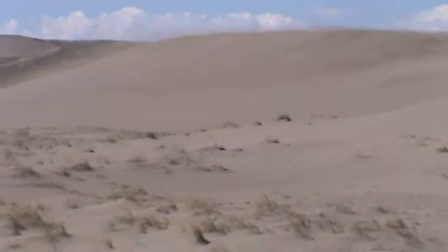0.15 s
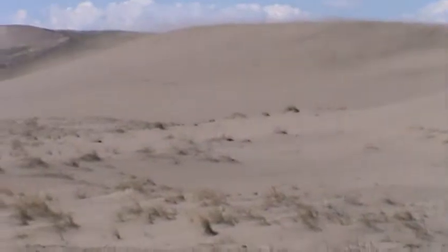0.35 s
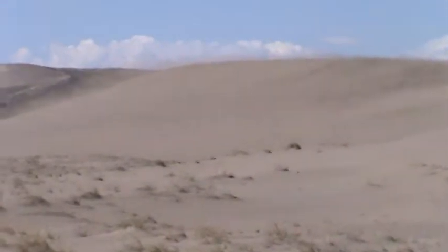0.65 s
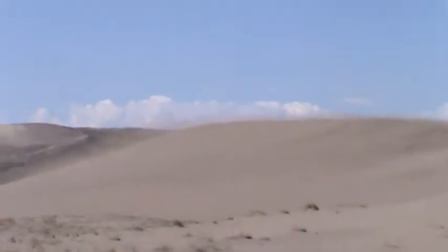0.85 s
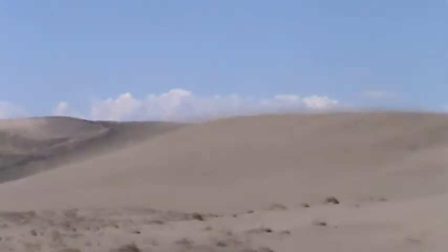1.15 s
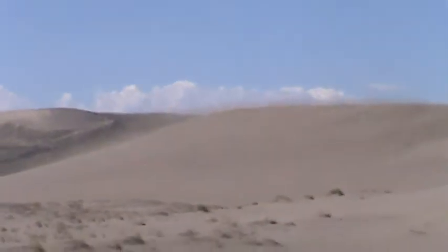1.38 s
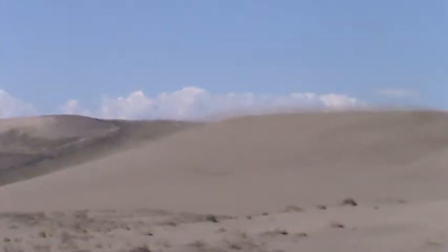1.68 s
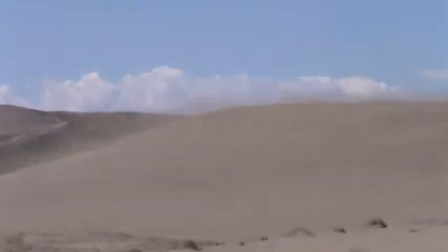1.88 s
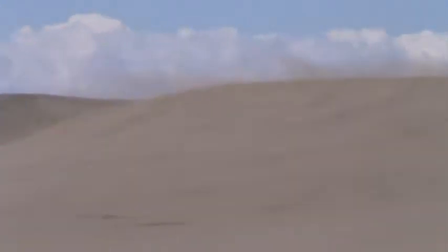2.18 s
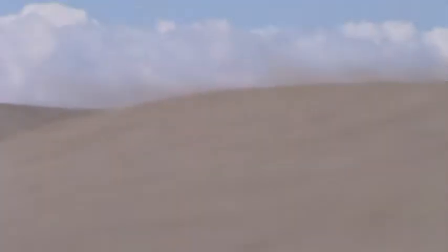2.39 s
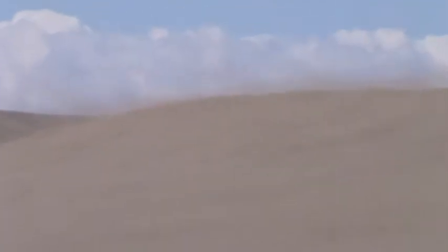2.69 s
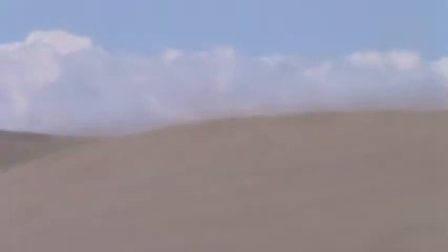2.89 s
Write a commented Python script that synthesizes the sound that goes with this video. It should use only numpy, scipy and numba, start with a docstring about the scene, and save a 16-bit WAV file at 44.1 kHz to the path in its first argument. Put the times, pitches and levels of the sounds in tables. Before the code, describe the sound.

Strong wind blows straight into an unshielded stereo microphone on open dunes. A low, rasping roar opens with thumps near 0.2 and 0.4 s, then runs fairly steadily, its airy hiss brighter around 0.6 s. It drops briefly about 1.3-1.5 s, then returns with heavy bass buffets at 1.6-1.8 s. From 2 s it turns choppy, with quick gaps, flaring gusts, pops near 2.3 and 2.7 s, and faint sand ticks.

```python
"""Strong wind over open dunes roars in a camera's two microphone ports, exposed with no distance between.
Faster flow sheds smaller eddies, so each gust brightens the roar: bands of noise follow body, flow and hiss.
Big slow eddies thump both ports together, as bass noise and as single pressure pulses.
Drifting sand hisses faintly, a few grains tick on the housing, and a limiter holds the loudest buffets down."""
import sys
import numpy as np
from scipy import signal
from scipy.fft import rfft, irfft
from scipy.io import wavfile
from scipy.ndimage import uniform_filter1d
from numba import njit

SR = 44100
rng = np.random.default_rng(int(sys.argv[2]) if len(sys.argv) > 2 else 0)


def store_wav(level_fs):
    """Save 16-bit WAV to argv[1]."""
    pcm = np.round(np.clip(np.atleast_2d(level_fs), -1, 1) * 32767)
    wavfile.write(sys.argv[1], SR, pcm.T.astype(np.int16))


N = 134064
TIME = np.arange(N) / SR  # t/s
FREQ = np.maximum(np.arange(N // 2 + 1) * SR / N, 1)  # f/Hz, held above zero for the logarithms

# Colour tables give relative density, since colour() evens out their total power.
# colour of the drifting sand's hiss [f/Hz, level/dB per Hz]
SAND_HISS_COLOUR = [(500,2),(2500,4),(5800,-3),(9000,-13),(15500,-19.5)]
# sand grains striking the housing, before colouring [t/s, level/dB, decay/s]
GRAIN_TICKS = [(1.5159,-18,0.0012),(1.6653,-27,0.0015),(2.24,-22.5,.001),(2.2402,-17.5,0.0015),(2.2558,-21,0.0017)]
# colour of a tick on the housing [f/Hz, level/dB per Hz]
TICK_COLOUR = [(800,-9.5),(2400,-6.5),(2950,9),(3600,-6.5),(5000,0.5),(7600,-4.5),(9700,-20.5),(15500,-21)]
# course of the bass buffeting, before its trim [t/s, level/dB]
BUFFET_LEVEL = [(0.0, -24), (0.08, -30.5), (0.17, -16.5), (0.22, -33), (0.315, -19.5), (0.34, -27),
                (0.445, -23.5), (0.58, -30), (0.71, -29), (0.74, -26), (0.78, -35), (0.97, -26.5),
                (1.065, -31), (1.14, -24.5), (1.39, -31), (1.425, -25.5), (1.46, -44), (1.495, -18),
                (1.575, -32), (1.635, -16), (1.66, -24), (1.705, -18), (1.735, -34), (1.79, -18),
                (1.915, -29.5), (1.995, -20), (2.175, -21.5), (2.24, -29), (2.285, -16.5), (2.32, -30),
                (2.42, -30), (2.68, -19), (2.845, -24), (2.89, -20), (2.99, -20), (3.04, -22.5)]
# colour of the big eddies [f/Hz, level/dB per Hz]
RUMBLE_COLOUR = [(12,-18.5),(25,-6),(45,-3.5),(75,0.5),(125,1.5),(200,-7),(400,-20.5),(1000,-74)]
# single hard buffets [t/s, left peak/full scale, right peak/full scale, half-length/s]
THUMPS = [(0.1626,0.3,0.46,0.0011),(0.4,0.36,0.77,0.0011),(1.6166,0.35,0.022,.0016),(1.643,0.6,.22,0.0026),(2.288,-0.46,-0.23,0.0033),(2.699,-0.44,-0.069,0.0023)]
# strength of the flow at the ports, as the level of its rasp [t/s, level/dB]
FLOW_LEVEL = [(0.0, -25), (0.015, -26.5), (0.075, -30), (0.12, -26), (0.14, -30.5), (0.17, -20),
              (0.19, -31.5), (0.26, -22.5), (0.545, -24), (0.575, -22), (0.7, -21.5), (0.71, -26),
              (0.735, -20.5), (0.97, -24), (1.0, -24.5), (1.23, -25.5), (1.25, -35), (1.265, -22),
              (1.31, -27), (1.33, -34), (1.355, -28.5), (1.38, -48), (1.393, -30), (1.404, -29),
              (1.42, -47), (1.47, -49), (1.52, -23), (1.59, -25.5), (1.6, -33), (1.64, -22), (1.7, -19.5),
              (1.73, -25), (1.76, -21), (1.772, -33), (1.817, -36.5), (1.825, -23), (1.965, -25.5),
              (1.985, -33.5), (1.995, -26.5), (2.055, -32), (2.085, -29), (2.095, -51), (2.115, -20.5),
              (2.125, -36), (2.13, -54), (2.145, -23.5), (2.19, -36), (2.205, -21), (2.29, -27),
              (2.325, -22), (2.385, -26.5), (2.45, -22.5), (2.46, -29.5), (2.485, -19), (2.5, -33),
              (2.52, -20.5), (2.575, -32.5), (2.59, -23.5), (2.62, -24), (2.628, -30), (2.67, -39),
              (2.695, -31.5), (2.735, -42.5), (2.753, -20.5), (2.805, -33), (2.825, -23), (2.85, -28.5),
              (2.885, -18), (2.895, -31.5), (2.935, -24.5), (3.02, -30), (3.04, -32)]
# course of the roar's low body [t/s, level/dB]
BODY_LEVEL = [(0.0, -17.5), (0.02, -15.5), (0.075, -21.5), (0.12, -16), (0.21, -18), (0.26, -17),
              (0.97, -17.5), (1.235, -18), (1.245, -21.5), (1.27, -17.5), (1.375, -23.5), (1.405, -14),
              (1.412, -24), (1.475, -19.5), (1.483, -19.5), (1.635, -16.5), (1.93, -18.5), (1.965, -10),
              (1.985, -17.5), (2.025, -13.5), (2.1, -21.5), (2.115, -14), (2.13, -37), (2.15, -16),
              (2.535, -17.5), (2.57, -22.5), (2.59, -15), (2.665, -23), (2.705, -18.5), (2.72, -26.5),
              (2.77, -13.5), (2.79, -20), (2.995, -17.5), (3.04, -21)]
# course of the roar's treble hiss [t/s, level/dB]
SPRAY_LEVEL = [(0.0, -54), (0.08, -64), (0.115, -47), (0.205, -52), (0.365, -39.5), (0.555, -49),
               (0.61, -37), (0.645, -33.5), (0.705, -39.5), (0.74, -36.5), (0.8, -40.5), (0.95, -40),
               (1.005, -47), (1.215, -45), (1.255, -52), (1.275, -42.5), (1.34, -60), (1.385, -57),
               (1.4, -43.5), (1.415, -65), (1.535, -45), (1.595, -52.5), (1.675, -37), (1.77, -49),
               (1.818, -48), (1.83, -36.5), (1.865, -47), (1.895, -38), (2.135, -56), (2.145, -46.5),
               (2.19, -53), (2.24, -34), (2.285, -45.5), (2.35, -41.5), (2.365, -50.5), (2.443, -43),
               (2.458, -52), (2.487, -39), (2.497, -46.5), (2.57, -49.5), (2.618, -44), (2.632, -56),
               (2.73, -69), (2.76, -42.5), (2.815, -56), (2.882, -40.5), (2.9, -54), (2.925, -43.5),
               (3.01, -48.5), (3.04, -60)]
# colour of the roar at the usual flow [f/Hz, level/dB per Hz]
ROAR_COLOUR = [(60,-31),(130,-2.5),(250,1),(480,-0.5),(800,-5.5),(1300,-13.5),(2000,-21),(3300,-33),(4800,-36.5),(6500,-44.5),(9500,-63),(15500,-73)]
# how each band of the roar follows its controls
# [f/Hz, gain/dB per dB of body, per dB of flow, per dB of hiss, share of the flutter]
BAND_RESPONSE = [(147,0.14,0.038,0.0081,0.2),(346,1.45,0.15,0.035,.5),(760,0.74,0.78,0,0.68),(1610,0,1.0,0.34,1.08),(4560,0.5,0.58,0.84,1.3),(11000,-0.1,.1,1.34,1.1)]
# likeness of the two ports in the roar [f/Hz, coherence/0-1, left's lead/rad]
PORT_LIKENESS = [(102,1,-0.34),(310,0.54,-1.03),(606,0.31,-1.5),(1318,0,-2.5),(1400,0.1,2.5),(2310,0.4,2),(3080,0.42,0.53),(5300,0.84,0),(9200,0.1,1.5),(14000,.8,-2.5)]

HISS_DB, TICK_ATTACK_S = -58.5, 0.00094
RUMBLE_DB, RUMBLE_LIKENESS, RUMBLE_LEFT_DB = -0.4, 0.93, 1
USUAL_FLOW_DB, USUAL_BODY_DB, USUAL_SPRAY_DB = -26, -17.5, -44.5
ROAR_DB, RIGHT_DB = -16, 0.2
FLUTTER_HZ, FLUTTER_DB, OWN_FLUTTER_DB = 60, 1.98, 0.8  # shared by the ports, and each port's own
STEADYING_PER_DB = 0.1  # strong flow flutters less
SHIFT_HZ, SHIFT_DB = 15, 1.18  # each band of the roar also swells by itself
LIMIT_DB, LIMIT_ATTACK_S, LIMIT_RELEASE_S = -6.5, 0.00043, 0.016
TOP_HZ = 15850


def undb(db):
    """Decibels to gain."""
    return 10 ** (np.asarray(db) / 20)


def curve(table):
    """A control through time, in straight lines between the table's points."""
    return np.interp(TIME, *np.array(table).T)


def at(table, hz, axis=1):
    """A table column read along a log-frequency axis."""
    rows = np.array(table)
    return np.interp(np.log(hz), np.log(rows[:, 0]), rows[:, axis])


def colour(table):
    """Filter gains that keep the power of white noise."""
    gain = undb(at(table, FREQ))
    return gain / np.sqrt(np.mean(gain ** 2))


def port_noise(likeness, lead=0):
    """Spectra of two partly alike white noises, the left ahead by lead in radians."""
    mid, side = rfft(rng.standard_normal((2, N)))
    coherence = np.clip(likeness, 0, 1)
    sign = np.array([[1], [-1]])  # left, right
    ports = np.sqrt((1 + coherence) / 2) * mid + sign * np.sqrt((1 - coherence) / 2) * side
    return ports * np.exp(0.5j * sign * lead)


def even(noise):
    """Takes the slow chance swells out of a stereo noise, so that its controls set its level."""
    power = uniform_filter1d(np.mean(noise ** 2, axis=0), size=1800)  # about 41 ms
    return noise * np.sqrt(power.mean() / power)


def flutter(hz):
    """Random wavering, mostly slower than hz, between soft bounds."""
    ratio = FREQ / hz
    waver = irfft(rfft(rng.standard_normal(N)) * ratio / (1 + ratio ** 2) ** 2, N)
    return 1.65 * np.tanh(waver / waver.std())


def drifting_sand():
    """Drifting sand makes a faint steady hiss: coloured noise, much alike at both ports."""
    hiss = port_noise(0.67) * colour(SAND_HISS_COLOUR)
    return irfft(undb(HISS_DB) * hiss, N)


def grain_ticks():
    """Single grains tick on the housing: noise with a quick rise and exponential decay, then coloured."""
    strikes = 0
    for start, db, decay in GRAIN_TICKS:
        age = np.maximum(TIME - start, 0)
        rise = np.minimum(age / TICK_ATTACK_S, 1)
        fall = np.exp(-np.maximum(age - TICK_ATTACK_S, 0) / decay)
        strikes = strikes + undb(db) * rise * fall
    bursts = strikes * irfft(port_noise(0.82), N)
    return irfft(rfft(bursts) * colour(TICK_COLOUR), N)


def buffeting():
    """Big eddies press on both ports at once, one lump after another: bass noise under a level curve."""
    push = even(irfft(port_noise(RUMBLE_LIKENESS) * colour(RUMBLE_COLOUR), N))
    port_trim = np.array([[RUMBLE_LEFT_DB], [0]])
    return push * undb(curve(BUFFET_LEVEL) + RUMBLE_DB + port_trim)


def thumps():
    """A single eddy hits the ports: a short push with a rebound on either side."""
    out = 0
    for time, left, right, length in THUMPS:
        u = ((TIME - time) / length) ** 2
        pulse = (1 - u) * np.exp(-u / 2)
        out = out + np.array([[left], [right]]) * pulse
    return out


def roar():
    """Turbulence at the ports: low body, rasp and hiss flare with the gusts and flutter most in the lulls."""
    likeness, lead = at(PORT_LIKENESS, FREQ), at(PORT_LIKENESS, FREQ, axis=2)
    eddies = port_noise(likeness, lead) * colour(ROAR_COLOUR)
    # each control in dB above its usual level
    flow = curve(FLOW_LEVEL) - USUAL_FLOW_DB
    body = curve(BODY_LEVEL) - USUAL_BODY_DB
    spray = curve(SPRAY_LEVEL) - USUAL_SPRAY_DB
    own_flutter = np.array([flutter(FLUTTER_HZ), flutter(FLUTTER_HZ)])
    waver = FLUTTER_DB * flutter(FLUTTER_HZ) + OWN_FLUTTER_DB * own_flutter
    waver = waver * np.clip(1 - STEADYING_PER_DB * flow, 0.3, 1.7)
    centres = np.log([row[0] for row in BAND_RESPONSE])
    out = 0
    # each row of the identity matrix makes one band, cross-fading into its neighbours
    for share, row in zip(np.eye(len(BAND_RESPONSE)), BAND_RESPONSE):
        _, by_body, by_flow, by_spray, by_waver = row
        band = even(irfft(eddies * np.interp(np.log(FREQ), centres, share), N))
        level = by_body * body + by_flow * flow + by_spray * spray + by_waver * waver
        shift = SHIFT_DB * flutter(SHIFT_HZ)
        out = out + band * undb(level + shift)
    return out * undb(ROAR_DB + np.array([[0], [RIGHT_DB]]))


def scene():
    """Sand and wind at the two ports."""
    return drifting_sand() + grain_ticks() + buffeting() + thumps() + roar()


@njit
def follow(size, attack, release):
    """Peak follower: closes a fixed share of the gap per sample, one share rising and one falling."""
    out, level = np.empty(len(size)), 0.
    for i in range(len(size)):
        level += (size[i] - level) * (attack if size[i] > level else release)
        out[i] = level
    return out


def record(dry):
    """The microphones' limiter ducks both channels on the biggest buffets; the top is cut."""
    loudest = np.abs(dry).max(axis=0)
    peak = follow(loudest, 1 / (LIMIT_ATTACK_S * SR), 1 / (LIMIT_RELEASE_S * SR))
    held = dry / np.maximum(peak / undb(LIMIT_DB), 1)
    top_cut = signal.ellip(8, 0.2, 70, TOP_HZ, fs=SR, output="sos")
    return signal.sosfilt(top_cut, held)


dry = scene()
out = record(dry)
store_wav(out)
```